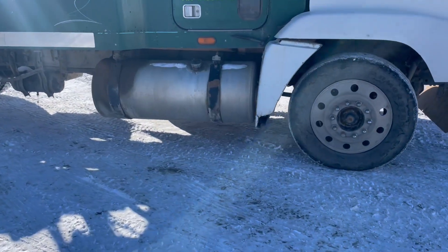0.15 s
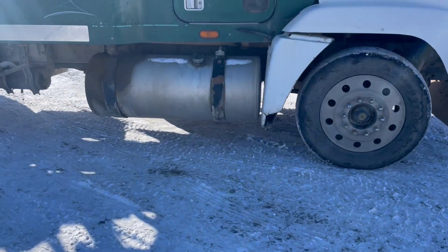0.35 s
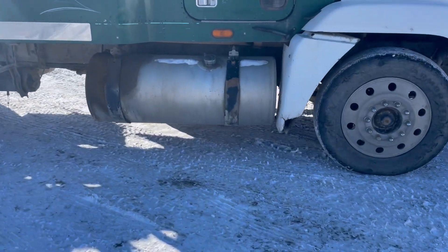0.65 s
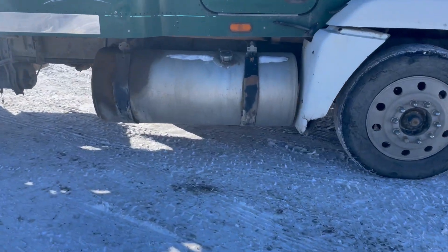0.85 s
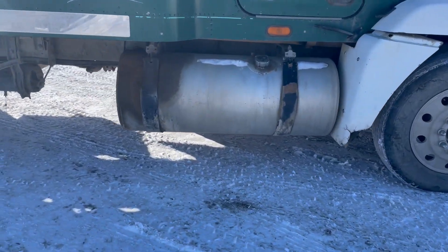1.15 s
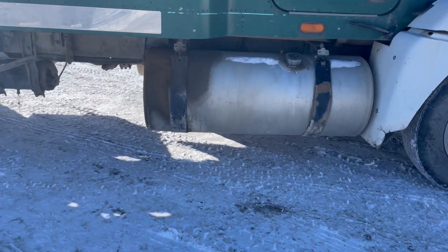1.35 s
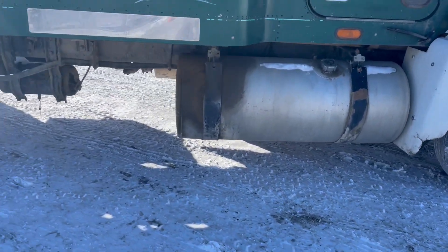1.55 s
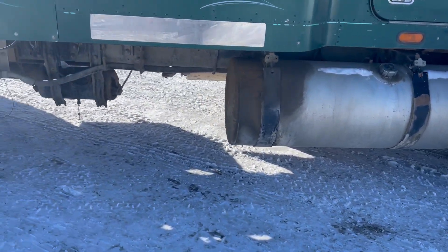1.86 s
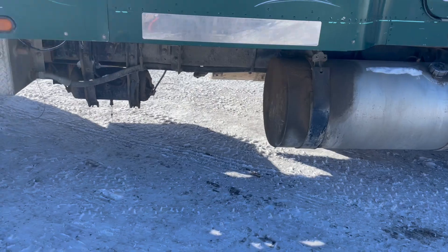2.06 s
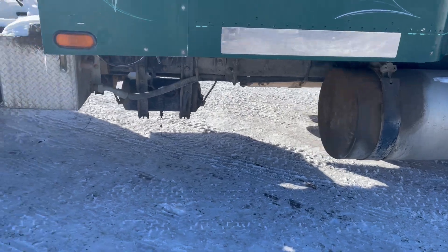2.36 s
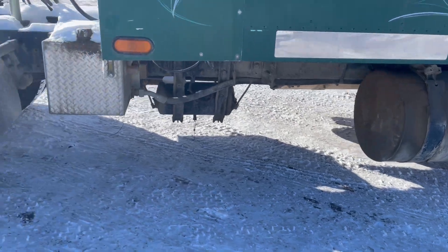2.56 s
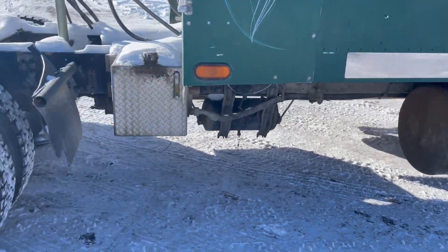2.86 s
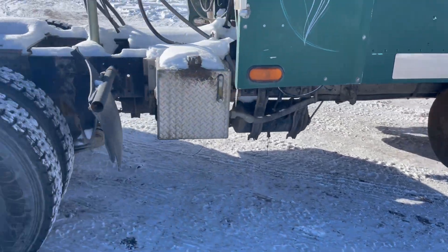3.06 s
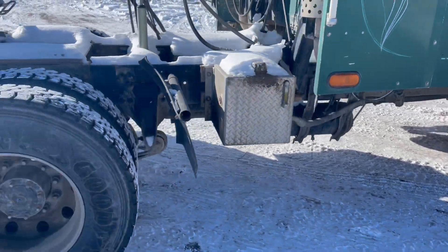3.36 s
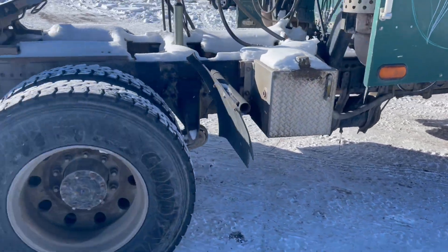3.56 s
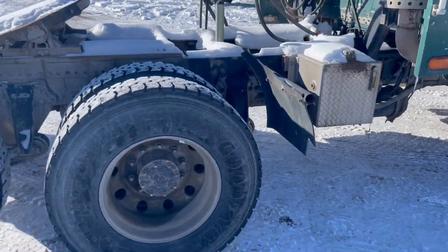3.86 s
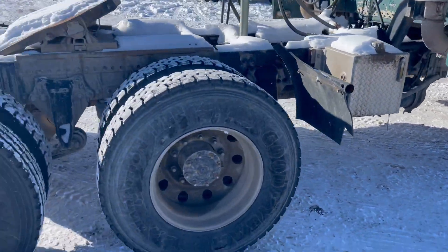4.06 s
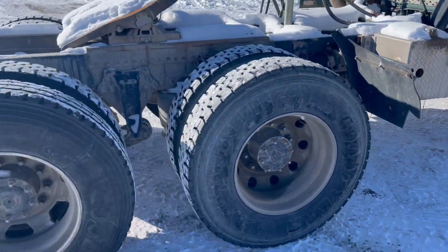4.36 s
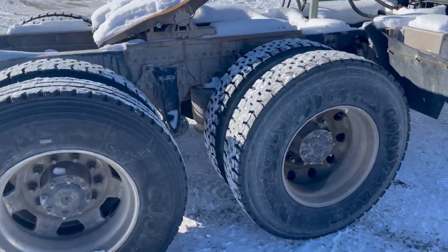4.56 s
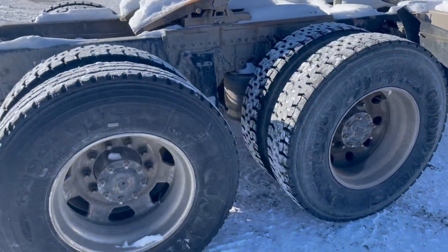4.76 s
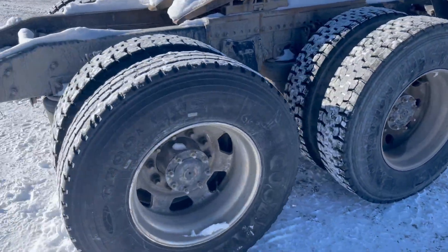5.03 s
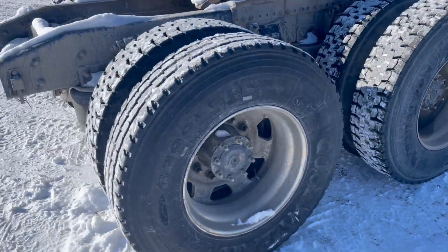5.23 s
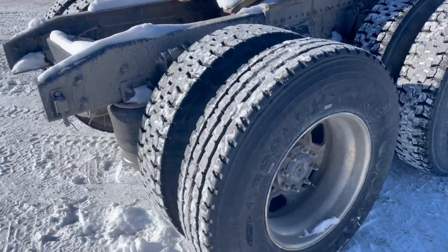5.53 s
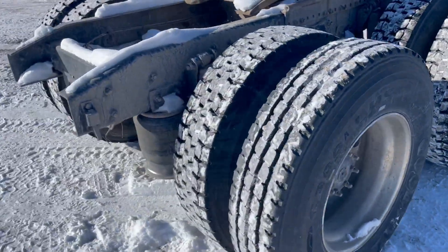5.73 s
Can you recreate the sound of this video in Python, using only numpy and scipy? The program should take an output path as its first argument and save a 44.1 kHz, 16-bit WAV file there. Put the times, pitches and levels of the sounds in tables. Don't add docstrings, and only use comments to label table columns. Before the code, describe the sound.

A big diesel truck revs and settles to a clattering idle, then gets short throttle blips and a hard, pinging rev in gusty wind.

```python
import sys
import numpy as np
from scipy import signal
from scipy.fft import rfft, irfft, next_fast_len
from scipy.io import wavfile
from scipy.ndimage import uniform_filter1d

SR = 44100
rng = np.random.default_rng(int(sys.argv[2]) if len(sys.argv) > 2 else 0)


def gain_from_db(level_db):
    decades = np.asarray(level_db, float) / 20
    return 10 ** decades


def waveform_to_disk(signal):
    frames = np.transpose(np.atleast_2d(signal))
    scaled = np.clip(frames, -1, 1) * 32767
    samples = np.round(scaled).astype(np.int16)
    wavfile.write(sys.argv[1], SR, samples)


N = 259749
SIZE = next_fast_len(N + 8192)
IDLE_PER_S = 34.1


def in_time(rows):
    s, *columns = np.transpose(rows)
    return [np.interp(np.arange(N) / SR, s, c) for c in columns]


def rms_one(x):
    return x / np.sqrt(np.mean(x ** 2) + 1e-20)


def drift(rate_hz):
    r = np.exp(-80 * np.pi * rate_hz / SR)
    slow = signal.lfilter([1], [1, -2 * r, r * r], rng.standard_normal(N // 40 + 2002))[2000:]
    return np.interp(np.arange(N) / 40, np.arange(len(slow)), rms_one(slow))


def bump(s, half_s):
    return np.exp(-((np.arange(N) / SR - s) / half_s) ** 2)


def modes(x, table):
    out = 0
    for hz, width_hz, db in table:
        r = np.exp(-np.pi * width_hz / SR)
        poles = [2, -4 * r * np.cos(2 * np.pi * hz / SR), 2 * r * r]
        out = out + gain_from_db(db) * signal.lfilter([1 - r * r, 0, r * r - 1], poles, x)
    return out


def patchy_noise(colour, patchy_db, rate_hz):
    octave = np.log2(np.fft.rfftfreq(SIZE, 1 / SR) + 1)
    hz, db = np.transpose(colour)
    shaped = rfft(rng.standard_normal(SIZE)) * gain_from_db(np.interp(octave, np.log2(hz), db, -120, -120))
    out, together = 0, drift(rate_hz)
    for centre in np.arange(np.log2(hz[0]), np.log2(hz[-1]) + .5, .5):
        band = np.clip(1 - 2 * abs(octave - centre), 0, 1)
        flicker_db = patchy_db * (0.38 * together + drift(rate_hz))
        out = out + irfft(shaped * band, SIZE)[:N] * gain_from_db(flicker_db)
    return rms_one(out)


def marks(turns):
    return np.flatnonzero(np.diff(np.floor(turns), prepend=np.floor(turns[0])))


def bursts(at, db, decay_s):
    clicks = np.full(N, 1e-18)
    clicks[at] = gain_from_db(db)
    return signal.lfilter([1], [1, -np.exp(-1 / (decay_s * SR))], clicks)


def tone(turns, level_db, flutter_db, wobble):
    phase = 2 * np.pi * turns + wobble * drift(20)
    return np.sqrt(2) * gain_from_db(level_db + flutter_db * drift(14)) * np.sin(phase)


def rings(hits, rise_s, t60_s, lift_db):
    out, t = np.zeros(N + SR), np.arange(SR // 12) / SR
    shape = (1 - np.exp(-t / rise_s)) ** 2 * gain_from_db(lift_db - 60 * t / t60_s)
    for s, db, hz in hits:
        i = round((s - rise_s) * SR)
        out[i:i + len(t)] += gain_from_db(db) * shape * np.sin(2 * np.pi * hz * t)
    return out[:N]


# (time [s], rate [firings per s])
SPEED = [(0, 44), (.3, 40.3), (.62, 48.3), (.75, 47.2), (1.18, 40.1), (1.66, 32.9), (1.76, 31.9),
         (2.0, 32.4), (3.64, 32.5), (3.76, 36.5), (4.19, 42), (4.3, 46), (4.7, 68), (4.84, 72.8),
         (4.99, 71.6), (5.24, 74.6), (5.65, 63.8), (5.89, 60)]


def crank():
    per_s, = in_time(SPEED)
    fired = np.cumsum(per_s) / SR
    return per_s, fired - fired[round(1.95 * SR)]


# (time [s], held [s], exhaust pulse level [dB], firing hum level [dB])
PEDAL = [
    (.3, 0.29, -34, -17),
    (3.68, 0.21, -21, -12.5),
    (3.83, 0.16, -20, -20),
    (3.97, 0.17, -23.5, -17),
    (4.11, 0.14, -18.5, -20),
    (4.2, 0.21, -22.5, -13),
    (4.4, 0.335, -18.5, -13),
    (4.72, 0.11, -20, -11.5),
    (5.03, 0.21, -22.5, -15),
]
PRESS_S, RELEASE_S = 0.04, 0.17


def fuelled(per_s):
    pulse_db, hum_db = np.full(N, -42.0), np.full(N, -40.0)
    growth_db = .15 * (per_s - IDLE_PER_S)
    off_best_db = ((per_s - 60) / 7.5) ** 2
    for s, held_s, pressed_db, humming_db in PEDAL:
        press = [(s, -30), (s + PRESS_S, 0), (s + held_s, 0), (s + held_s + RELEASE_S, -30)]
        lifted_db, = in_time(press)
        pulse_db = np.maximum(pulse_db, pressed_db + growth_db + lifted_db)
        hum_db = np.maximum(hum_db, humming_db - off_best_db + lifted_db)
    return pulse_db, hum_db


CYLINDERS = [7, -16, 0.5, 0, 0, -7]
# (pitch [Hz], width [Hz], level [dB])
PIPE = [(153, 36, 0), (172, 40, -2), (214, 36, -2.5), (365, 60, -2.5), (425, 70, -3.5)]
# (pitch [Hz], half width [Hz], level over pulses [dB], lowest overtone, highest overtone)
STACK_NOTES = [(150, 10, -3, 2, 2), (192, 38, -1.5, 2, 4), (385, 60, -6, 5, 9), (655, 45, -15, 8, 13)]


def exhaust(fired, per_s, level_db, hum_db, uneven_db):
    at = marks(fired)
    uneven = uneven_db * rng.standard_normal(600)[:len(at)]
    clicks = np.full(N, 1e-18)
    clicks[at] = gain_from_db(np.take(CYLINDERS, np.arange(len(at)) % 6) + uneven) / per_s[at]
    blunt = signal.sosfilt(signal.butter(2, 500, fs=SR, output="sos"), clicks)
    pulses = rms_one(modes(modes(blunt, PIPE), PIPE))
    hum = np.sqrt(2) * gain_from_db(hum_db + 0.45 * drift(7)) * np.sin(2 * np.pi * fired - .4)
    for hz, half_hz, db, low, high in STACK_NOTES:
        for k in range(low, high + 1):
            nearness = np.exp(-((k * per_s - hz) / half_hz) ** 2)
            hum += gain_from_db(level_db + db + 2.8 * drift(20)) * nearness * np.cos(2 * np.pi * k * fired)
    return gain_from_db(level_db - 5.5) * pulses + hum


# (time [s], level [dB])
EFFORT = [(0, -0.5), (.27, -1.5), (.33, 8), (.44, 11.5), (.6, 10), (.66, 3), (1.4, 0), (3.7, 1), (3.75, 11),
          (4.08, 2.5), (4.18, 9), (4.23, 17), (4.798, 18.5), (4.86, 7.5), (5.1, 11.5), (5.27, 6.5),
          (5.34, 7), (5.89, 6)]
# (time [s], distance [m])
WALK = [(0, 1.58), (1.3, 1.63), (2.0, 3.05), (2.6, 3.5), (3.6, 6.4), (5.89, 4.5)]


def engine_state(per_s):
    (effort_db,), (metres,) = in_time(EFFORT), in_time(WALK)
    return effort_db, 20 * np.log10(metres / 2), per_s - IDLE_PER_S


def level(law, effort_db, loss_db, over_idle):
    idle_db, by_effort, by_distance, by_speed = law
    return idle_db + by_effort * effort_db - by_distance * loss_db + by_speed * over_idle


def boost_rush():
    return in_time([(5.27, 0), (5.27 + 0.037, 4.0)])[0]


# (pitch [Hz], level [dB per Hz])
BLOCK = [(150, -45), (250, -7.5), (370, -1), (470, 0), (590, 2.5), (750, -2), (900, -1.5), (1150, -2.5),
         (1450, -10.5), (1800, -13), (2400, -29.5), (3500, -22.5)]
# (pitch [Hz], level [dB per Hz])
LOAD = [(1000, 1.5), (1600, -14.5), (2000, 0.5), (2700, -4), (3300, -9), (3900, -9.5), (4600, -12.5),
        (5300, -13.5), (6000, -17), (7000, -16.5), (8500, -24)]
# (pitch [Hz], width [Hz], level [dB])
COVER = [(1380, 80, -29), (1500, 174, 23), (1747, 72, 14)]
# (pitch [Hz], width [Hz])
KNOCK = [(1970, 190), (2680, 210), (3500, 480), (1050, 300), (1490, 70), (830, 130)]
# (idle [dB], share of effort, share of distance loss, speed [dB per firing per s])
KNOCK_LAWS = [(-63.5, 1.17, -1, -0.27), (-64.5, 1.15, -0.1, 0.29), (-61, 1.6, -0.5, -0.79),
              (-48.5, 0.94, 5.5, 0.065), (-70.5, 1.35, -0.5, 0.19), (-78.5, 0.93, -2, 0.34)]
# (time [s], mode number, level [dB])
FLARES = [(.33, 3, -38), (.39, 1, -37), (.45, 3, -40), (.51, 7, -48), (.56, 1.5, -36), (.61, 7, -41),
          (3.76, 1, -41), (3.81, 0, -32), (3.86, 0, -31), (3.93, 0, -33), (3.98, 0, -30), (4.25, 0, -26),
          (4.33, 0, -29), (4.37, 0.5, -22.5), (4.42, 2, -25.5), (4.48, 0.5, -35), (4.7, 2, -39),
          (4.5, 1, -28), (5.18, 0, -36), (5.19, 0, -42), (4.41, 4.5, -26), (4.55, 2.5, -32), (4.57, 6, -35),
          (4.64, 1, -23), (4.64, 1, -21), (4.72, 2, -33), (4.56, 4, -26), (4.77, 5, -33), (.53, 5, -26),
          (.6, 3, -28), (4.78, -2, -44), (4.77, 0.5, -45), (4.8, -5, -40), (4.84, -0.5, -26),
          (5.12, 0.5, -37), (5.12, 1, -40), (5.08, -0.5, -33), (5.235, -0.5, -24.5), (5.27, 0, -34),
          (5.4, 4, -39), (5.6, 4, -48)]
FLARE_S = 0.037


def combustion(fired, state, rush_db):
    block_db = level((-29, 0.7134, -0.08, -0.1556), *state)
    load_db = level((-41.5, 0.9163, -0.05, 0.0942), *state) + rush_db
    cover_db = level((-35.5, -0.11, 0.93, -0.0653), *state)
    at = marks(fired + .3)
    swell_blow, crack_blow = rng.standard_normal((600, 2))[:len(at)].T
    swell = bursts(at, 2.5 * swell_blow, decay_s=0.011)
    body = rms_one(patchy_noise(BLOCK, patchy_db=1.2, rate_hz=9) * (2.6 + swell))
    clatter = rms_one(patchy_noise(LOAD, patchy_db=0.87, rate_hz=10.0) * (2.5 + swell))
    cover = rms_one(modes(rng.standard_normal(N) * (2.0 + swell), COVER))
    out = gain_from_db(block_db - 0.9) * body + gain_from_db(load_db - 3.0) * clatter + gain_from_db(cover_db) * cover
    for k, (hz, width_hz) in enumerate(KNOCK):
        gain = gain_from_db(level(KNOCK_LAWS[k], *state))
        for s, mode, db in FLARES:
            if round(mode) == k:
                gain = gain + gain_from_db(db - 6.5) * bump(s, FLARE_S)
        crack = rng.standard_normal(N) * (.5 + bursts(at, 1.8 * crack_blow, decay_s=.004))
        rung = modes(modes(crack, [(hz, width_hz, 0)]), [(hz, 2 * width_hz, 0)])
        out += gain * rms_one(rung)
    return out, load_db


# (time [s], peak level [dB], pitch [Hz])
PINGS_LOW = [(0.355, -19, 1070), (0.427, -17, 1070), (0.455, -10.5, 990), (0.559, -18, 1020),
             (0.57, -9.5, 840), (3.749, -20, 870), (4.03, -21, 1080), (4.152, -14, 1040), (4.2, -24, 1020),
             (4.247, -24, 850), (4.268, -23, 1010), (4.29, -23, 930), (4.301, -23, 910), (4.413, -6, 906),
             (4.47, -10, 840), (4.524, -10, 880), (4.534, -18, 890), (4.577, -15, 826), (4.621, -15, 910),
             (4.632, -17, 1010), (4.684, -17, 820), (4.757, -16, 820), (4.77, -15, 780), (4.943, -18, 1040),
             (5.054, -25, 820), (5.129, -12, 935), (5.353, -19, 1010), (5.408, -24, 890), (5.465, -23, 910),
             (5.824, -14, 815)]
# (time [s], peak level [dB], pitch [Hz])
PINGS_MID = [(0.433, -25, 1980), (0.467, -25, 1960), (0.524, -26, 1910), (3.791, -21, 2090),
             (3.85, -23, 1990), (3.928, -24, 1990), (3.988, -23, 1880), (4.147, -18, 1940),
             (4.164, -26, 1950), (4.173, -22, 1820), (4.224, -20, 2090), (4.237, -19, 2040),
             (4.249, -13, 1890), (4.267, -16, 2010), (4.357, -17, 1970), (4.377, -18, 1935),
             (4.393, -15, 2080), (4.432, -15, 2160), (4.47, -19, 2150), (4.522, -16, 2120),
             (4.625, -10, 1950), (4.637, -14, 2050), (4.693, -25, 1930), (4.753, -19, 2040),
             (4.771, -13, 1980), (4.783, -21, 1990), (4.81, -16, 2030), (4.825, -12, 2110),
             (4.84, -11, 2000), (4.892, -21, 2010), (4.937, -30, 1990), (5.036, -29, 1920),
             (5.086, -19, 2120), (5.16, -18, 2110), (5.175, -21, 2070), (5.229, -18, 1953),
             (5.251, -23, 2090), (5.283, -21, 2020), (5.362, -27, 1950), (5.37, -26, 2010),
             (5.477, -33, 1930), (5.536, -28, 1950), (5.671, -35, 1990), (5.718, -31, 2040),
             (5.769, -31, 2000)]
# (time [s], peak level [dB], pitch [Hz])
PINGS_HIGH = [(0.451, -30, 2710), (0.57, -27, 2760), (4.17, -27, 2510), (4.218, -17, 2560),
              (4.243, -19, 2560), (4.287, -22, 2590), (4.307, -14, 2600), (4.331, -17, 2640),
              (4.349, -11, 2620), (4.368, -11, 2600), (4.408, -8, 2700), (4.427, -6.5, 2660),
              (4.498, -20, 2700), (4.51, -17, 2570), (4.538, -16, 2600), (4.551, -13, 2720),
              (4.587, -14, 2680), (4.602, -12, 2700), (4.62, -11, 2640), (4.649, -7, 2720),
              (4.722, -17, 2710), (4.735, -15, 2710), (4.763, -19, 2670), (4.777, -22, 2570),
              (4.806, -14, 2670), (4.818, -18, 2540), (4.833, -15, 2590), (4.977, -26, 2610),
              (5.084, -24, 2620), (5.097, -24, 2600), (5.113, -20, 2660), (5.124, -20, 2690),
              (5.15, -20, 2700), (5.165, -25, 2650), (5.177, -25, 2620), (5.217, -26, 2710),
              (5.305, -28, 2680), (5.379, -22, 2730), (5.413, -22, 2770), (5.476, -25, 2780),
              (5.58, -28, 2690), (5.617, -30, 2720), (5.651, -27, 2740), (5.714, -28, 2560),
              (5.774, -26, 2550)]
# (time [s], peak level [dB], pitch [Hz])
PINGS_TOP = [(0.335, -28, 3410), (0.361, -29, 3500), (0.448, -26, 3440), (0.473, -31, 3470),
             (0.496, -29, 3460), (0.559, -26, 3360), (0.603, -23, 3320), (3.747, -24, 3420),
             (3.769, -23, 3450), (3.777, -26, 3440), (3.853, -34, 3500), (4.156, -34, 3430),
             (4.223, -22, 3610), (4.279, -31, 3400), (4.297, -29, 3380), (4.337, -30, 3560),
             (4.353, -27, 3630), (4.379, -25, 3510), (4.395, -28, 3450), (4.421, -38, 3370),
             (4.51, -27, 3460), (4.546, -26, 3340), (4.611, -21, 3320), (4.636, -25, 3470),
             (4.713, -19, 3510), (4.749, -25, 3450), (5.016, -32, 3440), (5.361, -26, 3600),
             (5.397, -29, 3400), (5.476, -31, 3620)]


def pings():
    hits = PINGS_LOW + PINGS_MID + PINGS_HIGH + PINGS_TOP
    return rings(hits, rise_s=0.001987, t60_s=0.036, lift_db=2.5)


def valve_ticks(fired, load_db):
    at = marks(fired / 3)
    strong = np.floor(fired[at] / 3) % 2 == 0
    db = -45 + np.where(strong, 0, -4) + 1.5 * rng.standard_normal(200)[:len(at)]
    tick = rng.standard_normal(N) * bursts(at, db, decay_s=.012)
    bright = signal.butter(2, [2800, 12500], "band", fs=SR, output="sos")
    return signal.sosfilt(bright, tick) * gain_from_db(-0.1 * (load_db + 41))


WHINE_DB = {1: -55, 2: -56, 3: -44, 4: -62, 6: -58}
# (time [s], thirds, half length [s], level [dB])
SWELLS = [(0.01, 1, 0.084, -31), (0.893, 1, 0.049, -32), (1.154, 1, 0.14, -31.5), (.05, 2, 0.34, -39.5),
          (0.19, 6, 0.14, -46), (.56, 6, .07, -52), (0.72, 6, 0.05, -43.5), (.82, 6, .06, -50),
          (0.027, 6, .05, -49), (5.6, 2, 0.11, -34.5), (3.95, 3, 0.085, -43), (0.95, 6, 0.09, -45),
          (0.743, 3, 0.057, -37), (1.095, 3, 0.014, -35), (1.114, 3, 0.016, -32), (1.155, 3, 0.026, -32),
          (1.2, 3, 0.025, -29), (1.24, 3, 0.022, -27.5), (1.285, 3, .008, -29), (1.3, 3, 0.02, -27.5),
          (1.33, 3, .02, -35), (1.4, 3, .14, -43), (1.797, 3, 0.12, -29.5), (2.003, 3, 0.12, -38),
          (2.347, 3, 0.37, -45.5), (2.883, 3, 0.057, -33), (3.286, 3, 0.29, -46), (4.116, 3, 0.1, -39),
          (4.81, 3, 0.07, -34), (1.1, 4, 0.02, -40), (1.15, 4, .03, -34)]
WHINE_TEETH = 27.35


def whine(fired):
    out = 0
    for k, rest_db in WHINE_DB.items():
        gain = gain_from_db(rest_db)
        for s, thirds, half_s, db in SWELLS:
            if round(thirds) == k:
                gain = gain + gain_from_db(db) * bump(s, half_s)
        out = out + gain * tone(fired * WHINE_TEETH * k / 3, 0, flutter_db=.5 + .3 * k, wobble=.11 * k)
    return out


# (time [s], speed [turns per s], whistle level [dB])
TURBO = [(0, 3940, -67), (.3, 3780, -70), (.55, 3690, -71), (.8, 3575, -65), (1.15, 3420, -66),
         (1.5, 3250, -67), (1.95, 3000, -67), (2.45, 2750, -66), (2.9, 2600, -64), (3.3, 2500, -70),
         (3.7, 2450, -69), (4.15, 2480, -66), (4.4, 2800, -76), (4.9, 3500, -76), (5.2, 3680, -72),
         (5.6, 3980, -71), (5.89, 4100, -70)]
# (multiple of shaft speed, level [dB])
TURBO_LINES = [(2, -.5), (3, 0), (4, -1), (5, -9)]
# (pitch [Hz], width [Hz], lift [dB])
INTAKE = (7550, 800, 9)


def turbo():
    shaft_hz, whistle_db = in_time(TURBO)
    turns = np.cumsum(shaft_hz) / SR
    duct_hz, width_hz, lift_db = INTAKE
    out = 0
    for k, db in TURBO_LINES:
        near = np.exp(-((k * shaft_hz - duct_hz) / width_hz) ** 2)
        top_lift_db = 4 * (k * shaft_hz > 12800)
        line_db = whistle_db + 2.5 + db + lift_db * near + top_lift_db
        out = out + tone(k * turns, line_db, flutter_db=3.0, wobble=1.3 + 5 * near ** 6)
    return out


# (multiple of firing rate, level [dB])
IDLE_ORDERS = [(2, -38), (11, -45), (13.5, -44), (16, -42), (18.5, -44)]


def idle_tones(fired, per_s):
    settled = np.exp(-((per_s - 32.4) / 1.5) ** 2)
    return settled * sum(tone(k * fired, db, flutter_db=2.5, wobble=.35) for k, db in IDLE_ORDERS)


# (time [s], peak level [dB])
SHIELD_HITS = [
    (1.79, -26),
    (1.975, -18),
    (2.16, -15),
    (2.345, -20),
    (2.53, -27),
    (2.715, -28),
    (3.27, -19),
    (3.455, -21),
]


def shield():
    hits = [(s, db, 591) for s, db in SHIELD_HITS]
    return rings(hits, rise_s=0.00298, t60_s=0.097, lift_db=2.0)


# (pitch [Hz], level [dB per Hz])
AIR = [(5000, -56), (6500, -23), (7700, 1), (9000, 11.5), (10500, 3), (11500, 1), (12500, -12), (13500, -8),
       (14500, -10), (15600, 3), (16200, -50)]
# (time [s], level [dB])
PUFFS = [
    (.46, -73),
    (4.4, -44),
    (4.55, -44),
]


def intake_air(air_db):
    gain = gain_from_db(air_db + 3.0) + sum(gain_from_db(db) * bump(s, FLARE_S) for s, db in PUFFS)
    return gain * patchy_noise(AIR, patchy_db=1.0, rate_hz=15.0)


# (time [s], peak level [dB], start pitch [Hz], end pitch [Hz], 60 dB decay [s])
THUMPS = [(0.108, -6.5, 194, 118, 0.05), (0.12, -4.5, 324, 170, 0.022), (.178, -18, 330, 150, 0.035),
          (0.37, -7.5, 87, 53.7, 0.17), (.42, -11, 160, 80, 0.067), (0.451, -8, 111, 65, 0.14),
          (0.532, -2.5, 230, 130, 0.06), (0.5535, -3, 330, 200, 0.034), (0.5627, 4.5, 150, 75, 0.044),
          (.652, -8, 90, 60, .08), (0.706, -7.5, 199, 120, 0.046), (.785, -13, 170, 121, .05),
          (0.875, -14, 330, 200, 0.02), (1.547, -14.5, 240, 166, 0.15), (1.573, -11, 200, 120, 0.046),
          (2.224, -13.5, 108, 69, 0.13), (2.415, -7, 172, 75, 0.051), (2.784, -12, 122, 75, 0.1),
          (3.368, -8, 205, 108, 0.12), (3.685, -4, 203, 99, 0.051), (5.046, -3, 213, 123, 0.082),
          (5.467, -5, 187, 135, 0.088), (5.714, 3, 555, 442, 0.033), (5.722, 4, 153, 99, 0.027),
          (5.769, -7.5, 336, 240, 0.09), (5.8, -7, 298, 228, 0.06), (5.825, -4, 544, 417, 0.06),
          (5.835, -10, 430, 270, 0.08), (5.859, -6, 336, 252, 0.04), (5.872, 0.5, 277, 188, 0.11)]


def thumps():
    out, t = np.zeros(N), np.arange(SR // 5) / SR
    for s, db, hz, end_hz, t60 in THUMPS:
        turns = end_hz * t + (hz - end_hz) * 0.012 * (1 - np.exp(-t / 0.014))
        shape = gain_from_db(db - 60 * t / max(t60, .01)) * (1 - np.exp(-t / 0.0034))
        thump = shape * np.sin(2 * np.pi * turns)
        i = round(s * SR)
        out[i:i + len(t)] -= thump[:N - i]
    return out


# (time [s], level [dB])
GUSTS = [(0, -25), (.25, -22), (.44, -24.5), (.57, -20), (.64, -22), (.9, -22.5), (1.31, -29.5),
         (1.57, -22), (1.75, -31.5), (2.2, -23.5), (3.3, -25.5), (3.65, -22), (4.9, -18.5), (5.04, -13.5),
         (5.33, -16), (5.69, -18), (5.74, -6.5), (5.89, -6)]
# (pitch [Hz], level [dB per Hz])
RUMBLE = [(20, -36), (35, -7.5), (60, 4), (100, -0.5), (160, -2), (250, -10), (400, -13.5), (700, -28.5),
          (1000, -59)]


def wind(stack_db):
    gust_db, = in_time(GUSTS)
    gain = gain_from_db(-2.18) * np.hypot(gain_from_db(gust_db), gain_from_db(stack_db))
    return gain * patchy_noise(RUMBLE, patchy_db=2.5, rate_hz=14.0)


def scattered(x):
    cells = signal.stft(x, nperseg=1024)[2]
    chance = rng.standard_normal((2, *cells.shape))
    wander = uniform_filter1d(uniform_filter1d(chance, size=3, axis=1), size=8, axis=2)
    out = signal.istft(cells * np.exp(1j * 12 * wander), nperseg=1024)[1][:, :N]
    return out * np.std(x) / np.std(out)


# (pitch [Hz], left lead [radians], left minus right [dB], shared share [0-1])
PORTS = [(60, 0, -.8, .91), (300, -.2, -1.5, .93), (600, -.8, -4, .85), (1100, -.8, -2.5, .75),
         (1450, -1.2, -1, .72), (2200, -.4, 4, .65), (3200, .4, 5, .8), (5200, .4, 3.5, .88),
         (6000, -.3, 2, .9), (7100, -1.7, 1, .93), (8300, -3.1, 0, .95), (9600, -4.5, 0, .93),
         (11500, -6.3, 0, .93), (14500, -9.4, 0, .9)]


def ports(x, direct):
    hz, *columns = np.transpose(PORTS)
    at = np.log(np.fft.rfftfreq(SIZE, 1 / SR) + 1)
    lead, tilt_db, share = (np.interp(at, np.log(hz), c) for c in columns)
    side = np.array([[.5], [-.5]])
    shared = np.sqrt(share) * rfft(x, SIZE) + rfft(direct, SIZE)
    heard = np.exp(1j * side * lead) * shared + np.sqrt(1 - share) * rfft(scattered(x), SIZE)
    return irfft(heard * gain_from_db(side * tilt_db), SIZE)[:, :N]


def scene():
    per_s, fired = crank()
    state = engine_state(per_s)
    rush_db = boost_rush()
    pulse_db, hum_db = fuelled(per_s)
    stack = exhaust(fired, per_s, pulse_db, hum_db, uneven_db=4.0)
    engine, load_db = combustion(fired, state, rush_db)
    engine += valve_ticks(fired, load_db)
    engine += turbo()
    engine += intake_air(level((-59.5, 1.07, 0.57, -0.03), *state) + rush_db)
    direct = stack + pings() + whine(fired) + idle_tones(fired, per_s) + shield() + thumps()
    return ports(engine + wind(pulse_db - 9), direct)


# (low edge [Hz], high edge [Hz])
ONLY_SIDE_HZ = [(7680, 8950), (13750, 20000)]
# (low edge [Hz], high edge [Hz])
ONLY_MID_HZ = (10800, 13000)


def joined_treble(x):
    left, right = rfft(x, SIZE)
    hz = np.fft.rfftfreq(SIZE, 1 / SR)
    opposed = sum((hz > low) & (hz < high) for low, high in ONLY_SIDE_HZ)
    mid = (left + right) / 2 * (1 - opposed)
    side = (left - right) / 2 * ((hz < ONLY_MID_HZ[0]) | (hz > ONLY_MID_HZ[1]))
    return irfft(np.array([mid + side, mid - side]), SIZE)[:, :N]


def roll_off(x):
    return signal.sosfilt(signal.butter(12, 15800, fs=SR, output="sos"), x)


def record(dry):
    x = signal.sosfilt(signal.butter(2, 28, "high", fs=SR, output="sos"), dry)
    rounded = .98 * np.tanh(x / .98)
    return roll_off(joined_treble(rounded))


dry = scene()
out = record(dry)
waveform_to_disk(out)
```